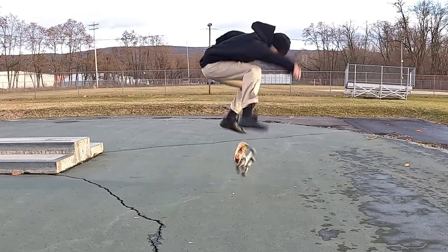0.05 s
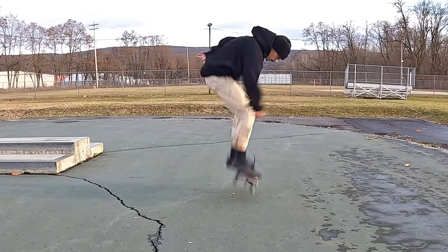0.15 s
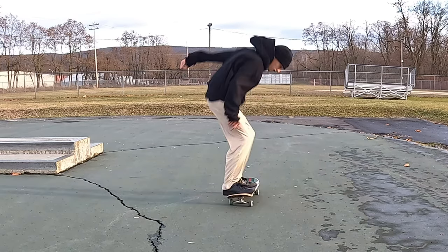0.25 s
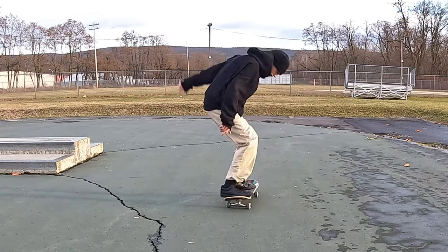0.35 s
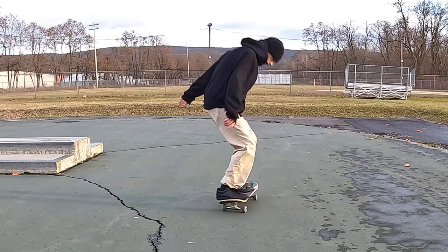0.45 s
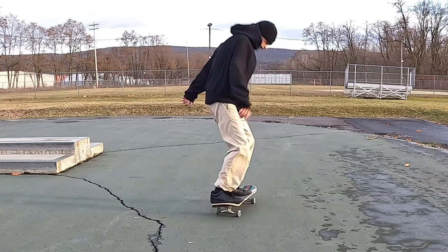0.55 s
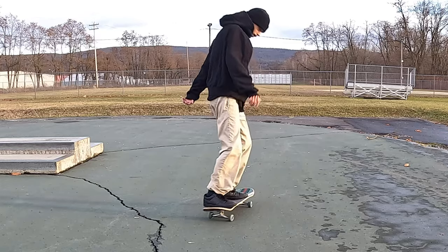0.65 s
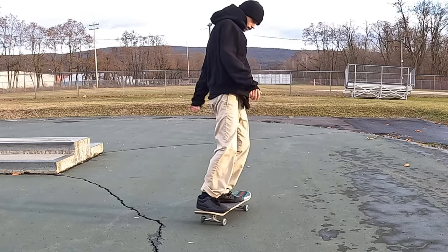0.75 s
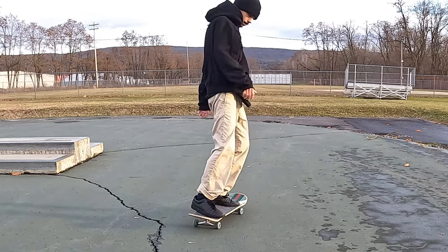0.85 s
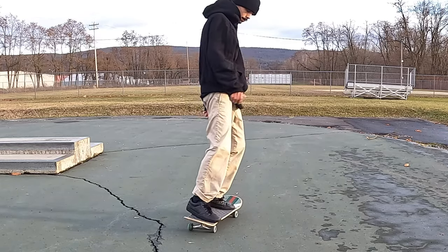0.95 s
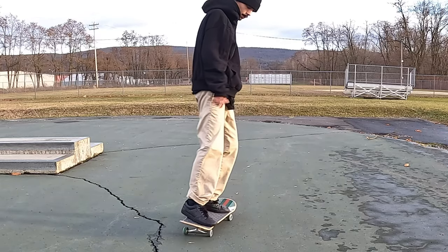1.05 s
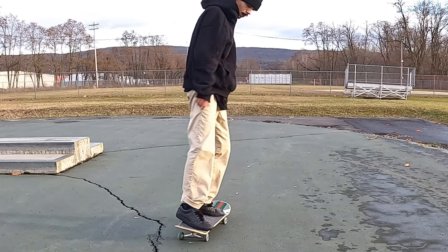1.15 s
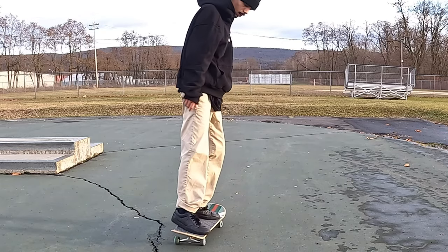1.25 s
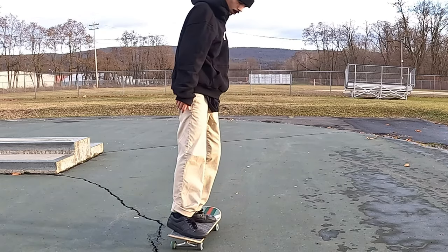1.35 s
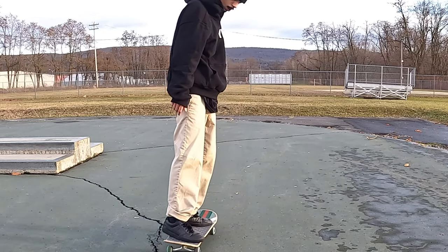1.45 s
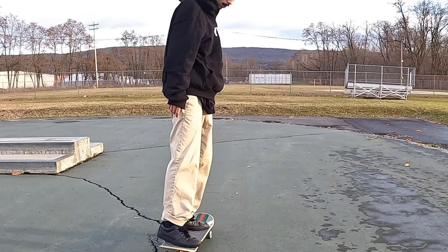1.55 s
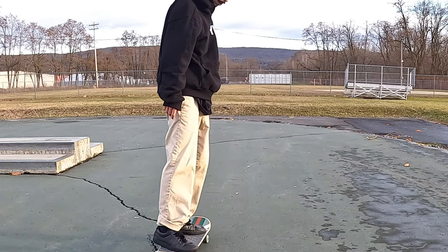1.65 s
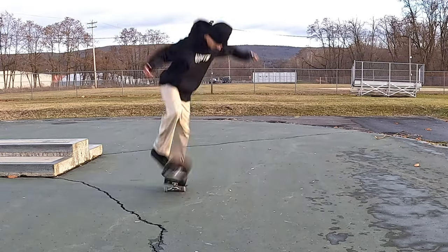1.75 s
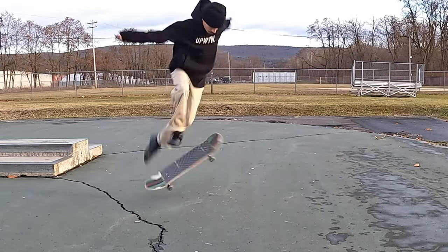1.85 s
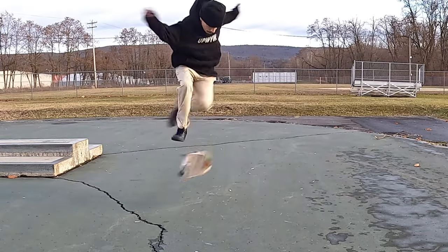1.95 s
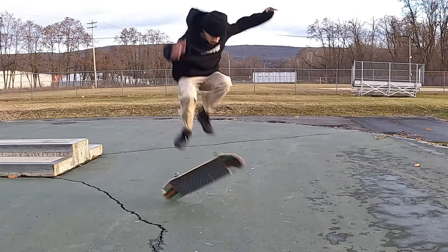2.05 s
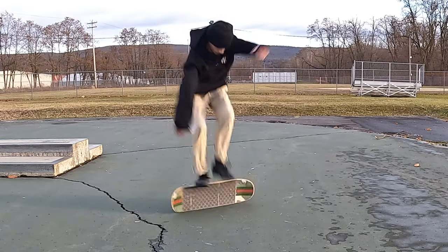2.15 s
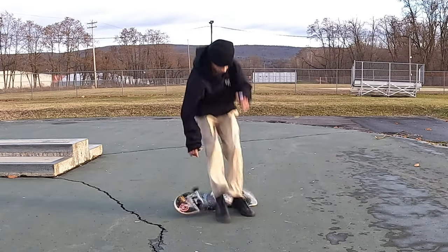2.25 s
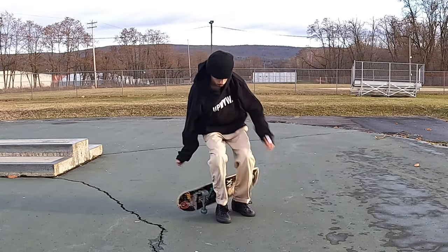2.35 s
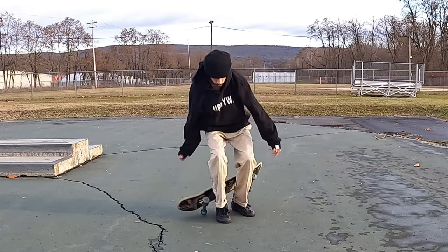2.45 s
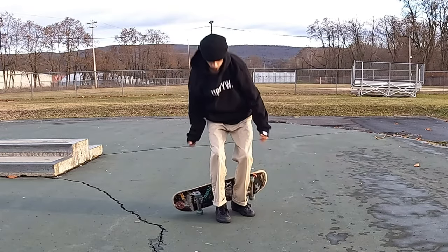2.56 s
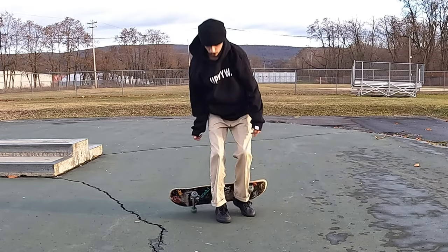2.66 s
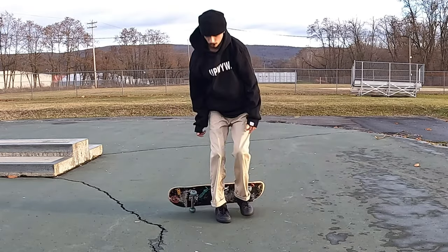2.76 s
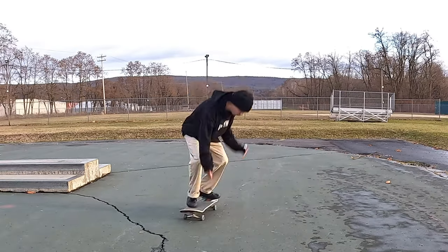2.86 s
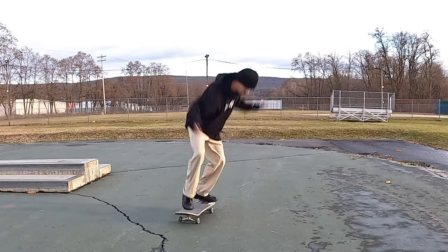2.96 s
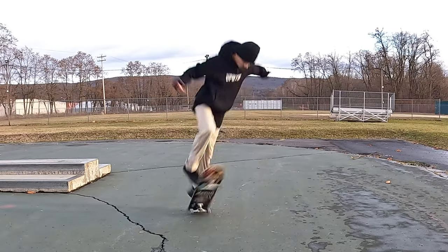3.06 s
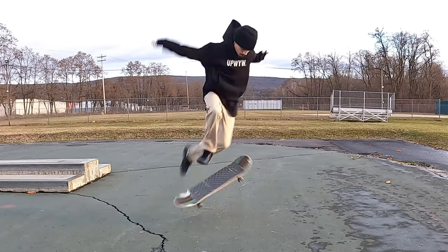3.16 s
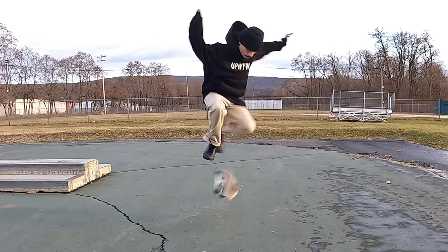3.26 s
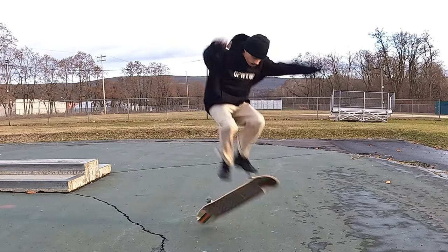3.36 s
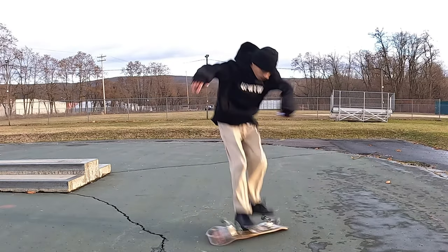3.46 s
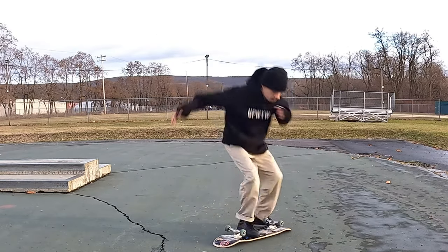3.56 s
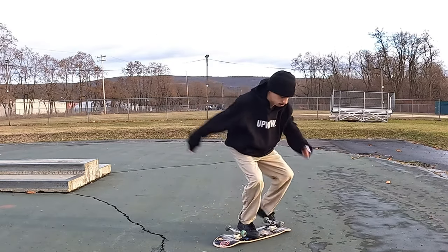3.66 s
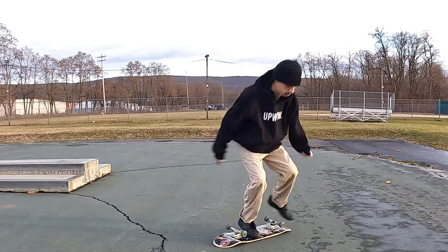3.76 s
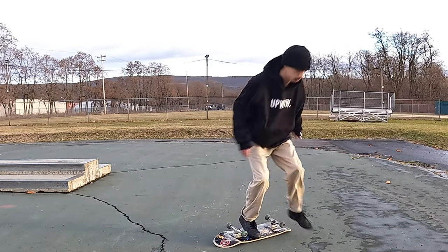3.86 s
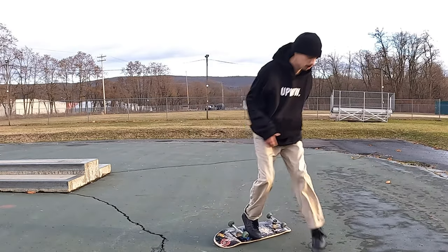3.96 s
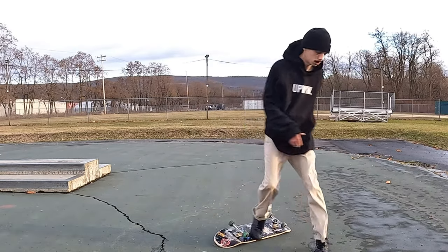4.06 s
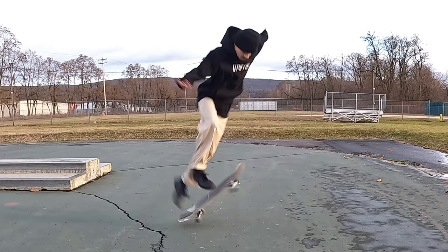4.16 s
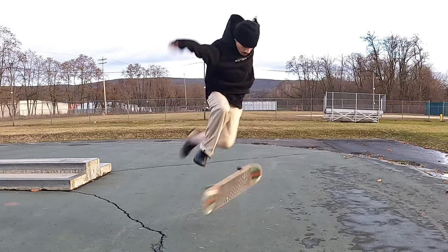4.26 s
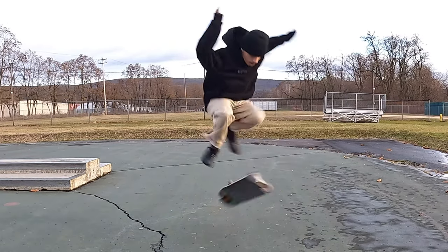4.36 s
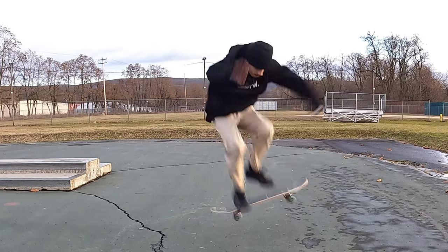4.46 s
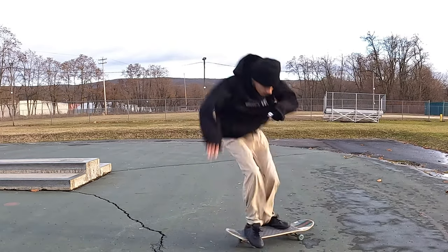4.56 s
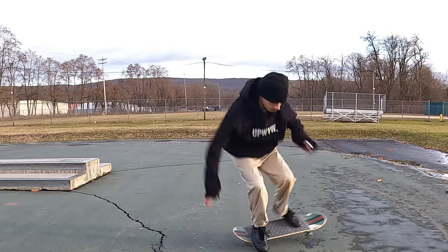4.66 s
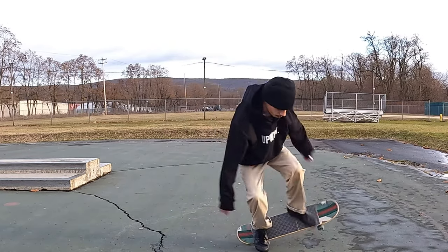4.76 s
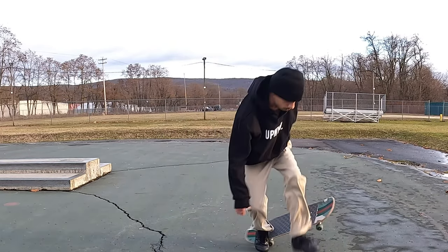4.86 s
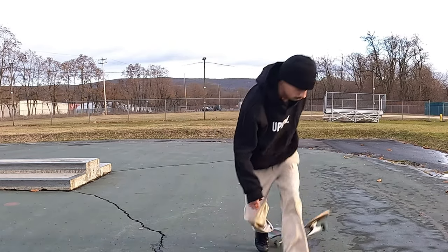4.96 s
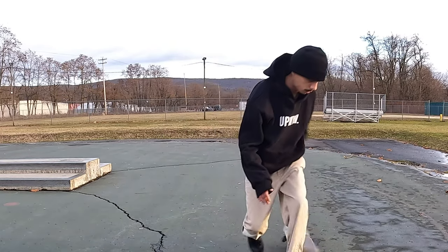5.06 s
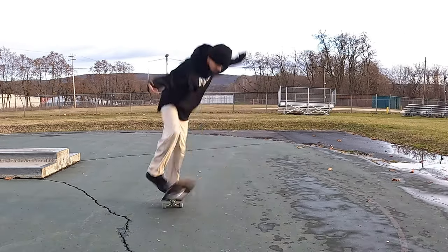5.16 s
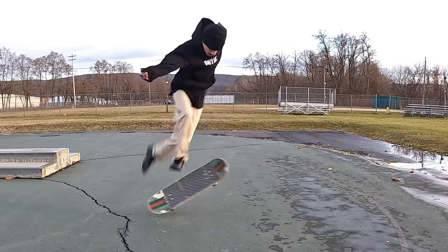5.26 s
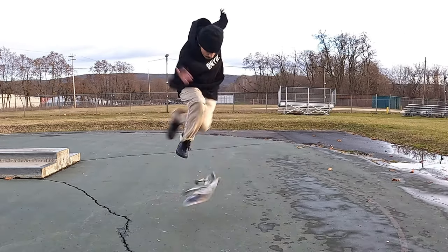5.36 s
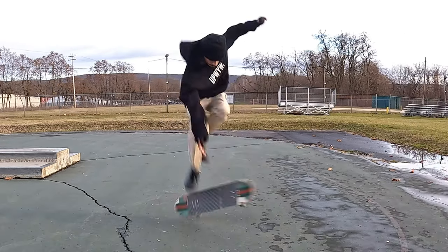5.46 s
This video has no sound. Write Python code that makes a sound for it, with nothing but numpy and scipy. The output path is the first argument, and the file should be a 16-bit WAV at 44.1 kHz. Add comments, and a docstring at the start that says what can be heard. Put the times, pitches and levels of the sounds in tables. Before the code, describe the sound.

An open outdoor court with low, soft air rumble and the faint fading echo of an earlier pop. At about 0.25 s a skateboard lands: a tight cluster of hard wood and metal clacks with a low thump and short scrape. Wheels roll quietly over grit until about 1.8 s, with faint sole shuffling around 0.9 to 1.3 s and small scuffs near 1.7 s. A loud, dry tail crack comes at 1.88 s; after a short airborne gap, board and shoes clatter, scrape and thud from 2.16 to 2.4 s, with a small knock at 2.54 s. Light rolling leads to a crack at 3.15 s and a clacking landing at 3.5 to 3.6 s. A scuff precedes the strong pop at 4.22 s, landing around 4.6 s. A weaker landing knock at 5.1 s is followed by a last pop and scrape at 5.29 s, its echo washing off distant trees, with faint bearing hiss to the end.

```python
"""A skateboarder tries flip tricks on an open asphalt court: the tail pops, then deck, trucks and shoes clatter down.
Blows are short noise bursts plus decaying deck modes; between tries, noise grit makes wheels roll and shoes scuff.
One reflection from a hard surface close by doubles every blow; a far tree line returns a faint decaying noise wash.
Coloured noise gives a low outdoor rumble whose level dips after heavy landings, then recovers."""
import sys
import numpy as np
from scipy import signal
from scipy.fft import rfft, irfft
from scipy.io import wavfile
from scipy.ndimage import uniform_filter1d

SR = 44100
rng = np.random.default_rng(int(sys.argv[2]) if len(sys.argv) > 2 else 0)


def master(y):
    """Save y as 16-bit WAV."""
    cut = np.clip(np.atleast_2d(y).T, -1, 1)
    pcm = np.round(cut * 32767)  # scale
    wavfile.write(sys.argv[1], SR, pcm.astype(np.int16))


N = 242991  # samples


def amp(db):
    """Decibels to gain."""
    return 10 ** (np.asarray(db) / 20)


def unit(x):
    """Scales to rms 1."""
    return x / np.sqrt(np.mean(x ** 2) + 1e-20)


def burst(x, span_s=0.025):
    """Scales a short sound to the energy of rms 1 held for span_s."""
    return x / np.sqrt(np.sum(x ** 2) / (span_s * SR) + 1e-20)


def add(mix, start_s, sound):
    """Mixes a sound in at start_s, cut at the end of the mix."""
    part = mix[round(start_s * SR):][:len(sound)]
    part += sound[:len(part)]


def colour(x, points, tilt_db_per_oct=0, cutoff_hz=None):
    """Minimum-phase filter from (Hz, dB) points; tilt acts from 250 to 3000 Hz about 800 Hz."""
    hz = np.maximum(abs(np.fft.fftfreq(4096, 1 / SR)), 10)
    point_hz, point_db = np.transpose(points)
    gain_db = np.interp(np.log(hz), np.log(point_hz), point_db)
    gain_db += tilt_db_per_oct * np.log2(np.clip(hz, 250, 3000) / 800)
    gain = amp(gain_db)
    if cutoff_hz is not None:
        gain = gain / np.sqrt(1 + (hz / cutoff_hz) ** 4)
    spectrum = np.exp(np.conj(signal.hilbert(np.log(gain))))
    taps = np.fft.ifft(spectrum).real
    return signal.fftconvolve(x, taps)[:len(x)]


def patchy(x, depth_db):
    """Lets patches of a few hundred Hz by some tens of ms swell and sink; depth_db is the rms swing."""
    z = signal.stft(x, nperseg=1024, noverlap=768)[2]
    patches = uniform_filter1d(rng.standard_normal(z.shape), size=9, axis=0)
    patches = uniform_filter1d(patches, size=11, axis=1)
    uneven = z * amp(depth_db * unit(patches))
    return signal.istft(uneven, nperseg=1024, noverlap=768)[1][:len(x)]


def rattle(t, fade_s, attack_s=0.00011):
    """Tiny contacts as dying noise, flattened in spectrum twice and each time refaded by the square root of the
    fade, so it falls about 30 dB per fade_s."""
    fade = amp(-60 * t / fade_s) * (1 - np.exp(-(t / attack_s) ** 2))
    x = rng.standard_normal(len(t)) * fade
    for _ in range(2):
        flat = irfft(np.exp(1j * np.angle(rfft(x))), len(t))
        x = flat * np.sqrt(fade)  # half the fade in dB
    return burst(x)


def grains(size, per_s, spread_db):
    """Sparse clicks of very uneven size, as from grit."""
    sizes = amp(spread_db * np.minimum(rng.exponential(1, size), 4))
    hits = rng.random(size) < per_s / SR
    return unit(rng.standard_normal(size) * sizes * hits)


def strokes(rows, points):
    """Short rubs over grit, each swelling and fading."""
    out = np.zeros(N)
    for start_s, length_s, level_db in rows:
        shape = signal.windows.tukey(int(length_s * SR), .7)
        grit = grains(size=len(shape), per_s=5000, spread_db=4.5)
        add(out, start_s, amp(level_db) * shape * unit(colour(grit, points)))
    return out


def motion_gain(rows, edge_s=0.044):
    """Gain for stretches of motion: each fades in, changes at a steady rate in dB, and fades out."""
    t = np.arange(N) / SR
    gain = np.zeros(N)
    for start, end, first_db, last_db in rows:
        times = [start - edge_s, start, end, end + edge_s]
        gain += amp(np.interp(t, times, [-100, first_db, last_db, -100]))
    return gain


# outdoor background spectrum: (frequency [Hz], level [dB])
AIR_SPECTRUM = [(20, -13.5), (31, -10), (39, 2.5), (45, 6), (54, -5.5), (100, -1), (170, -9.5), (260, -18),
                (500, -31.5), (1200, -28.5), (2500, -39), (5000, -55), (9000, -67.5), (15000, -76.5)]
# dips in the rumble's level: (centre [s], half-width [s], depth [dB])
LEVEL_DIPS = [(0.74, 0.27, -7), (2.6, 0.27, -9.5), (3.97, 0.23, -9), (4.9, .17, -7)]


def air(level_db=-35.5):
    """Low outdoor rumble with a faint distant hush: coloured noise, steady but for the dips."""
    t = np.arange(N) / SR
    dip_db = sum(db * np.exp(-((t - centre) / width) ** 2) for centre, width, db in LEVEL_DIPS)
    noise = colour(rng.standard_normal(N + SR), AIR_SPECTRUM)[SR:]  # filter settled
    return amp(level_db + dip_db) * unit(noise)


def tree_line(x, t60_s=2.0, arrival_s=0.11):
    """Far trees and buildings return a late, thin, uneven wash: convolution with decaying noise."""
    t = np.arange(2 * SR) / SR
    late = 1 / (1 + (arrival_s / (t + 1e-3)) ** 4)
    tail = rng.standard_normal(len(t)) * amp(-60 * t / t60_s) * late
    tail = colour(tail / np.linalg.norm(tail), [
        (150, -24.5), (500, 5.5), (1200, 0.0), (2100, -4), (2700, -5.0),
        (4000, -12.0), (5500, -1.5), (8000, -28.0), (15000, -52)])
    return patchy(signal.fftconvolve(x, tail)[:N], depth_db=3)


def nearby(x, delay_s=.0103, echo_db=-9, scatter_db=-20):
    """One clear reflection from a hard surface close by, with a little scatter after it, all coloured."""
    t = np.arange(SR // 5) / SR
    taps = amp(scatter_db) * burst(rattle(t, fade_s=.1), span_s=1 / SR)
    taps[0] += amp(echo_db)
    echo = signal.fftconvolve(x, taps)[:N]
    out = x.copy()
    add(out, delay_s, colour(echo, [(100, -8), (400, 1.5), (2000, 1.5), (5000, -4.5), (12000, 2.0)]))
    return out


# sole shuffling on the grip tape: (start [s], end [s], relative level at start [dB], at end [dB])
SHUFFLES = [(0.92, 1.14, -60, -59.5), (1.162, 1.2, -52.5, -51), (1.238, 1.303, -53, -55.5)]
# shuffle spectrum: (frequency [Hz], level [dB])
SHUFFLE_SPECTRUM = [(300, -5), (800, 15.5), (1500, 13), (2100, 5), (2800, 1), (4000, -6.5), (5100, -2),
                    (7500, -25), (10500, -22), (15000, -42)]
# short shoe scuffs: (time [s], length [s], level [dB])
SHOE_SCUFFS = [(1.697, 0.062, -49.5), (1.772, 0.024, -42), (2.725, 0.049, -42), (3.039, 0.033, -38),
               (4.109, 0.024, -36), (5.166, 0.023, -33)]
# scuff spectrum: (frequency [Hz], level [dB])
SCUFF_SPECTRUM = [(200, 14.5), (900, 7.5), (1800, 7), (2900, 3), (5000, -2.5), (8000, -12.5), (12000, -19),
                  (15000, -35)]
# skater's weight coming down through the shoes: (time [s], length [s], level [dB])
FOOTFALL_THUDS = [(2.16, 0.066, -23), (2.235, 0.073, -21), (2.345, 0.061, -22), (3.495, 0.068, -25.5),
                  (3.575, 0.047, -23), (4.603, 0.12, -27), (5.09, 0.053, -27.5)]
# thud spectrum: (frequency [Hz], level [dB])
THUD_SPECTRUM = [(25, -33.5), (60, 2), (90, 9), (125, 5.5), (200, 0.5), (400, -32), (1500, -44.5),
                 (8000, -82.5)]


def shoes():
    """Soles thud on the ground, and catch and slip on the grip tape in shuffles and quick scuffs."""
    grit = grains(size=N, per_s=4000, spread_db=2.5) + grains(size=N, per_s=170, spread_db=2)
    shuffle = amp(9.5) * motion_gain(SHUFFLES) * unit(colour(grit, SHUFFLE_SPECTRUM))
    scuffs = strokes(SHOE_SCUFFS, SCUFF_SPECTRUM)
    thuds = strokes(FOOTFALL_THUDS, THUD_SPECTRUM)
    return shuffle + scuffs + thuds


# rolling wheels: (start [s], end [s], relative level at start [dB], at end [dB])
WHEEL_ROLLS = [(0.36, 0.85, -45.5, -41), (0.88, 1.8, -48.5, -41), (2.41, 2.72, -36.5, -44.5),
               (2.74, 3.07, -40, -34.5)]
# rolling spectrum: (frequency [Hz], level [dB])
ROLL_SPECTRUM = [(50, -18.5), (100, 8.5), (170, 6.5), (300, 2.5), (550, -2), (800, -5), (1100, -10.5),
                 (1500, -6.5), (2200, -18.5), (3500, -31), (7000, -39), (14000, -65)]
# wheels spinning free, board off them: (start [s], end [s], relative level at start [dB], at end [dB])
WHEEL_SPINS = [(1.92, 2.16, -66, -59), (2.38, 2.8, -56.5, -69.5), (2.85, 3.55, -67.5, -61),
               (3.62, 4.11, -59, -63), (4.28, 4.56, -64, -61.5), (4.69, 5.04, -66, -86.5),
               (5.32, 5.51, -54.5, -74)]
# bearing hiss spectrum: (frequency [Hz], level [dB])
SPIN_SPECTRUM = [(400, -3), (1500, 9.5), (3200, 4), (4800, -5), (5600, -7.5), (6200, -9), (7300, -16.5),
                 (9200, -17.5), (10500, -21), (12000, -18.5), (14000, -48)]


def wheels():
    """Hard wheels run over the grit of the asphalt, or hiss in their bearings when free."""
    grit = patchy(grains(size=N, per_s=3500, spread_db=3.5), depth_db=4.0)
    rolling = amp(-0.5) * unit(colour(grit, ROLL_SPECTRUM)) * motion_gain(WHEEL_ROLLS)
    balls = patchy(rng.standard_normal(N), depth_db=0.9)
    spinning = amp(7.5) * unit(colour(balls, SPIN_SPECTRUM)) * motion_gain(WHEEL_SPINS)
    return rolling + spinning


# maple deck modes, before scatter and length scaling: (frequency [Hz], level [dB], t60 [s])
DECK_MODES = [(209, -3.5, 0.076), (299, -3, 0.043), (395, -5.5, 0.044), (520, -5, 0.037),
              (594, -5.5, 0.034), (709, -5.5, 0.045), (882, -10, 0.067), (1089, -5, 0.034),
              (1141, -6, 0.053), (1377, -11, 0.044), (1576, -4.5, 0.036), (1740, -8.5, 0.035),
              (2174, 1, 0.018), (2350, -11.5, 0.052), (2720, -18.5, 0.033), (3146, 3.5, 0.014)]


def deck(t, length_factor, scatter_db):
    """Decaying deck modes, weighted a little differently at each point of impact."""
    hz, level_db, t60_s = np.transpose(DECK_MODES)[:, :, None]
    weight_db = level_db + scatter_db * rng.standard_normal(hz.shape)
    sign = rng.choice([-1, 1], hz.shape)
    decay_db = -60 * t / (t60_s * length_factor)
    return np.sum(sign * amp(weight_db + decay_db) * np.sin(2 * np.pi * hz * t), axis=0)


# metal truck clack spectrum: (frequency [Hz], level [dB])
CLACK_SPECTRUM = [(400, -2.5), (1500, -8.5), (2400, 3), (3200, 8), (4200, -0.5), (5500, -7), (7500, -21),
                  (11000, -23), (13500, -33.5), (16000, -46.5)]
# ringing deck spectrum: (frequency [Hz], level [dB])
RING_SPECTRUM = [(200, -7), (600, -12), (1000, 1.5), (1900, 0.5), (2600, -11), (4000, -13.5), (6000, -23.5),
                 (14000, -46.5)]
# dull wood spectrum: (frequency [Hz], level [dB])
WOOD_SPECTRUM = [(80, -13), (200, 1), (450, 6.5), (750, 2.5), (1100, 0), (2000, -16), (3000, -45),
                 (5000, -68), (8000, -59.5), (15000, -82.5)]
# bending notes of the deck: (frequency [Hz], level [dB])
BEND_NOTES = [(195, -5.5), (295, 0.5)]


def knock(strength_db, hard_db, flex_db, length_factor):
    """A landing blow: trucks clack, deck rings and clatters, the weight on it bends it in a low thump."""
    t = np.arange(SR // 6) / SR
    modes = burst(deck(t, length_factor=1.11 * length_factor, scatter_db=4.5))

    contact = rattle(t, fade_s=0.0056, attack_s=0.00099)
    loose_parts = rattle(t, fade_s=0.084, attack_s=0.00088)
    loose_parts = colour(loose_parts, [(2000, 2), (4500, -7.5), (8000, -3.0), (15000, -9)])
    clack = burst(colour(contact + amp(1.5) * loose_parts, CLACK_SPECTRUM), span_s=0.00024)

    ring = rattle(t, fade_s=0.1 * length_factor, attack_s=0.00081) + amp(-7.0) * modes
    ring = burst(colour(ring, RING_SPECTRUM), span_s=0.0022)

    wood = rattle(t, fade_s=0.1 * length_factor, attack_s=0.00095) + amp(-9.5) * modes
    # more bend, deeper wood
    wood = burst(colour(wood, WOOD_SPECTRUM, tilt_db_per_oct=-0.22 * flex_db), span_s=0.0043)

    bend = sum(amp(db) * np.sin(2 * np.pi * hz * t) for hz, db in BEND_NOTES)
    bend_shape = np.exp(-t / (0.0075 * length_factor)) * (1 - np.exp(-t / 0.0026))
    thump = burst(bend * bend_shape, span_s=0.002)

    # harder blow: more ring, less wood
    body = amp(-1 + 0.12 * hard_db) * ring + amp(0.5 - 0.053 * hard_db) * wood
    return amp(strength_db) * (amp(hard_db) * clack + body + amp(flex_db) * thump)


def stomp(note_hz=125.7, decay_s=0.012):
    """The board takes the skater's whole weight: a low note that swells and dies."""
    t = np.arange(SR // 4) / SR
    return burst(np.sin(2 * np.pi * note_hz * t) * t * np.exp(-t / decay_s), span_s=.0015)


# deck edge grinding on the asphalt: (time [s], length [s], level [dB])
EDGE_SCRAPES = [(0.238, 0.07, -30.5), (2.172, 0.046, -33), (2.214, 0.047, -30.5), (2.280, 0.032, -37),
                (2.333, 0.034, -29), (2.385, 0.033, -37), (4.655, .03, -30.5), (5.118, 0.032, -32),
                (5.290, 0.028, -24.5)]
# grinding spectrum: (frequency [Hz], level [dB])
SCRAPE_SPECTRUM = [(150, 5), (400, 9), (900, 4), (1600, 2), (2300, -3), (3500, -10), (6000, -18.5),
                   (11000, -30.5), (15000, -43.5)]
# blows of the board coming down: (time [s], strength [dB], hardness [dB], flex [dB])
# hardness > 0: metal trucks, < 0: wood and shoe; flex: bend of the deck
BOARD_KNOCKS = [(0.2348, -24, 9.5, 4), (0.2793, -9.5, 5, -3.5), (0.2952, -13, -8, -1),
                (0.306, -17.5, -8, -1), (2.159, -11.5, -3.5, -8.5), (2.215, -21.5, -15, 1.5),
                (2.2368, -10.5, 3.5, -1), (2.2476, -15, 11, 11.5), (2.2852, -18, -15, 4),
                (2.318, -26, 8, -2), (2.3264, -17, 9.5, 1), (2.356, -18, 8, -0.5), (2.364, -14, -8.5, 4),
                (2.5355, -28, 9, -2), (2.8018, -38, 12, -4), (3.493, -20, -44, 1), (3.511, -13, -28, -9),
                (3.561, -15.5, 16.5, -9), (3.5748, -13.5, 4, -7.5), (3.5822, -15.5, 12, -15.5),
                (3.5931, -18.5, -11, -10), (4.567, -23.5, 5, -7), (4.5803, -26.5, 8.5, -3.5),
                (4.6082, -8.5, 4, 0), (4.6166, -12, -10, 4.5), (4.648, -15, 6, 3), (4.6526, -13, -4.5, -1),
                (5.0573, -34.5, -11, 14), (5.092, -31.5, 8.5, -2), (5.111, -15.5, -2, -1),
                (5.2973, -20.5, -1.5, 7)]


def board(rebound_s=.021, first_length=0.53, rebound_length=1, stomp_s=.281):
    """The board clatters and grinds down; blows within rebound_s of the last ring longer."""
    out = strokes(EDGE_SCRAPES, SCRAPE_SPECTRUM)
    last_s = 0
    for hit_s, strength_db, hard_db, flex_db in BOARD_KNOCKS:
        length_factor = rebound_length if hit_s - last_s < rebound_s else first_length
        add(out, hit_s, knock(strength_db, hard_db, flex_db, length_factor))
        last_s = hit_s
    add(out, stomp_s, stomp())
    return out


def wheel_swell(swell_db, rise_s=0.021):
    """The back wheels dig in harder and harder until the tail lands: exponentially rising noise."""
    t = np.arange(-SR // 10, 0) / SR
    noise = colour(rng.standard_normal(len(t)), SCRAPE_SPECTRUM, tilt_db_per_oct=-3.0)
    return amp(swell_db) * unit(noise) * np.exp(t / rise_s)


# tail crack spectrum: (frequency [Hz], level [dB])
CRACK_SPECTRUM = [(150, -25), (500, -9), (1000, -3), (2000, 3.5), (3200, 1.5), (4500, -3), (7000, -13),
                  (11000, -19), (15000, -64)]


def pop(crack_db, ring_db, bright_db_per_oct, contact_hz):
    """The tail hits the asphalt: a hard crack builds within milliseconds, and the free deck rings."""
    t = np.arange(SR // 5) / SR
    contact = rattle(t, fade_s=.0025, attack_s=.0018)
    contact += amp(-9) * rattle(t, fade_s=.04, attack_s=.0006)
    crack = burst(colour(contact, CRACK_SPECTRUM, cutoff_hz=contact_hz), span_s=0.0004)
    modes = deck(t, length_factor=1, scatter_db=1) * (1 - np.exp(-t / .0003))
    ring = burst(colour(modes, RING_SPECTRUM, tilt_db_per_oct=bright_db_per_oct), span_s=.0045)
    return amp(crack_db) * crack + amp(ring_db) * ring


# tail strikes: (time [s], crack [dB], deck ring [dB], ring brightness [dB/octave],
# loaded-wheel swell just before [dB], contact cut-off [Hz], strike sent to the trees [dB])
TAIL_POPS = [(0.2337, -14, -16, 2.5, -39, 3000, -29), (1.8751, -2.5, -14, 1, -26.5, 4640, -21),
             (3.1526, -4, -13, 0.5, -26.5, 4020, -26), (4.2217, -1, -14, 5, -20, 2540, -16),
             (5.2835, -11.5, -17.5, 1.5, -25.5, 4750, -5.5)]


def pops():
    """Tail strikes as heard directly, and as the tilted deck throws them towards the trees."""
    direct, thrown = np.zeros((2, N))
    for hit_s, crack_db, ring_db, bright_db_per_oct, swell_db, contact_hz, echo_db in TAIL_POPS:
        swell = wheel_swell(swell_db)
        strike = pop(crack_db, ring_db, bright_db_per_oct, contact_hz)
        add(direct, hit_s - len(swell) / SR, np.r_[swell, strike])
        add(thrown, hit_s, amp(echo_db) * strike)
    return direct, thrown


def scene():
    """Board, wheels and shoes on the open court; at first the pop of a trick already in the air still echoes."""
    tails, thrown = pops()
    landings = board()
    close = nearby(tails + landings + wheels() + shoes())
    out = close + tree_line(thrown + amp(-31.5) * landings) + air()
    earlier_pop = pop(crack_db=-19.5, ring_db=-34.0, bright_db_per_oct=4.5, contact_hz=2500)
    add(out, 0, tree_line(earlier_pop)[int(.2 * SR):])
    return out[None]


def record(dry, edge_hz=16300):
    """Rounds the loudest peaks off just under full scale, then limits the band."""
    rounded = dry / (1 + (dry / .97) ** 6) ** (1 / 6)
    lowpass = signal.firwin(255, edge_hz, window=("kaiser", 9), fs=SR)
    return signal.oaconvolve(rounded, lowpass[None], "same")


dry = scene()
out = record(dry)
master(out)
```